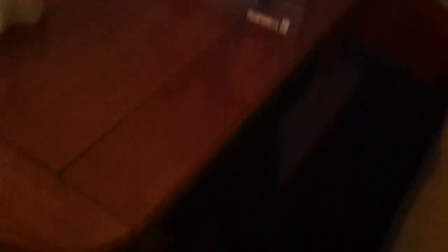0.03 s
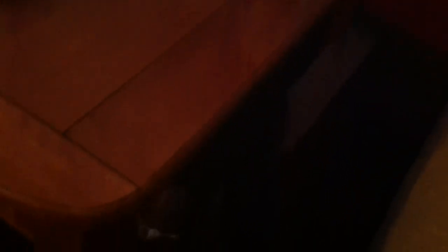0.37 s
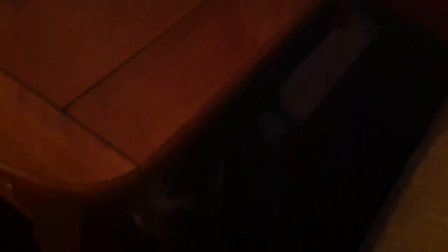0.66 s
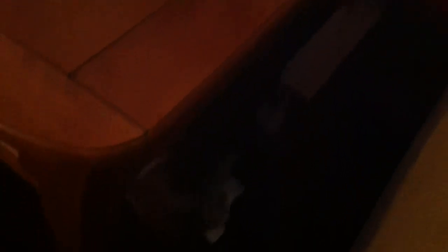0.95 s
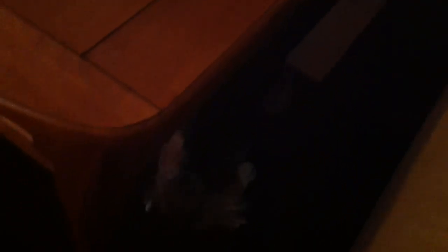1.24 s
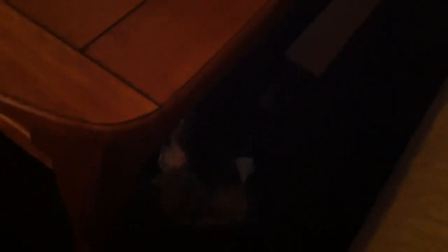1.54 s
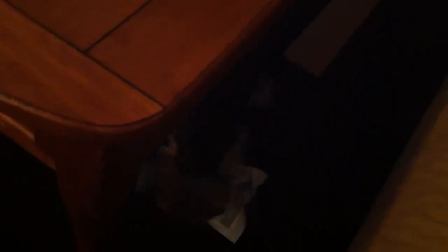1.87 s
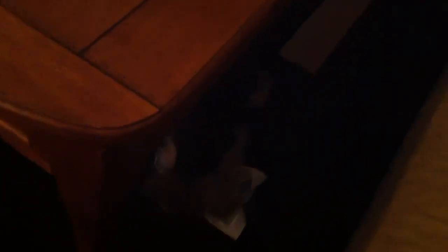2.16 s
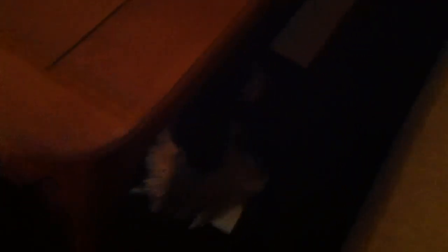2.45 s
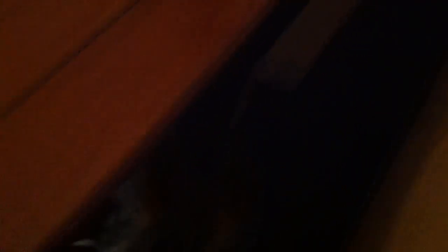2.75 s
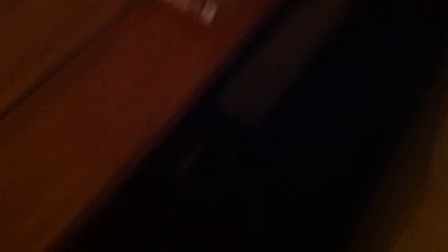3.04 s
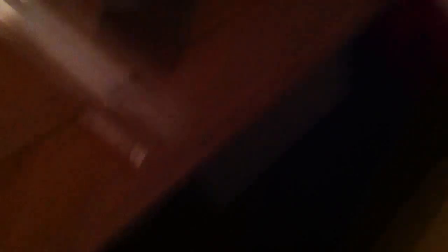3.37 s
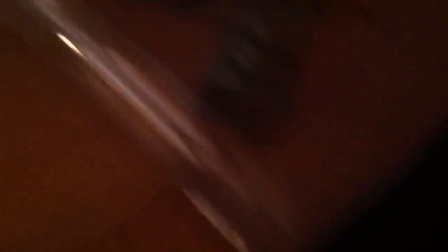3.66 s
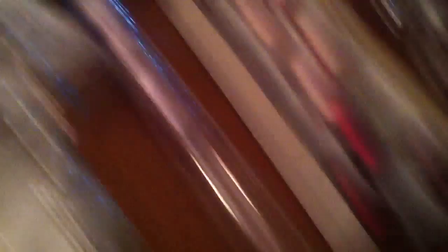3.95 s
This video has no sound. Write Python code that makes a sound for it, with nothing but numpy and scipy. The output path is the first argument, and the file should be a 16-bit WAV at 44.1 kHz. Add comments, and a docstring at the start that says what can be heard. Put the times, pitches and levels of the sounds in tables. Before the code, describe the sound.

Paper rustles softly as a small animal paws it on the floor, with short rubs, crisp crackles and a few light pats in the first 1.5 seconds. The rustles thin out, then grow busier from 2.7 seconds, with more pats around 3. From 3.2 seconds a long, bright swish with sharp crackles swells, loudest near 3.4, fading by 4 into the quiet room's low murmur and faint hiss.

```python
"""A sheet of paper, pawed by a small animal on the floor of a quiet room.
Each push rubs the sheet: tiny friction slips, coloured by its resonances.
Creases buckle and snap, ringing the facets beside them; paws and paper pat the floor.
Near the end one long, bright swish dies away over the low murmur of the room's air."""
import sys
import numpy as np
from scipy import signal
from scipy.fft import rfft, irfft
from scipy.io import wavfile
from scipy.ndimage import uniform_filter1d

SR = 44100
rng = np.random.default_rng(int(sys.argv[2]) if len(sys.argv) > 2 else 0)


def master(y):
    """Save y as 16-bit WAV."""
    cut = np.clip(np.atleast_2d(y).T, -1, 1)
    pcm = np.round(cut * 32767)  # scale
    wavfile.write(sys.argv[1], SR, pcm.astype(np.int16))


N = 176400
TIME_S = np.arange(N) / SR

# pushes on the sheet: start_s, rise_s, fade_s, level_db, tilt_db_per_octave
PUSHES = [(-.03, 0.029, 0.4, -52.5, -3.5), (0.051, 0.021, 0.04, -47, -1.5), (.17, 0.021, 0.04, -48, -4),
          (0.269, 0.0063, 0.16, -48, -0.3), (.38, 0.14, 0.075, -57, 0), (0.628, 0.027, 0.3, -49, -1.4),
          (.81, 0.026, 0.028, -54, 1.5), (.924, 0.0085, 0.1, -52.5, -2.5), (1.09, 0.034, 0.02, -47, -2),
          (1.13, 0.0091, 0.39, -60.5, -1), (1.348, 0.043, 0.02, -43, -0.6),
          (1.56, 0.037, 0.13, -57.5, -1.5), (1.893, 0.019, 0.051, -48.5, -1.2),
          (1.935, 0.034, 0.028, -53, 2), (2.14, 0.026, 0.41, -58.5, -2), (2.29, 0.038, 0.052, -50, -1.2),
          (2.42, 0.032, 0.019, -54, 1.5), (2.52, 0.14, 0.35, -56.5, -4), (2.693, 0.013, 0.078, -42, -2),
          (2.92, 0.032, 0.29, -52.5, -2), (2.995, 0.021, 0.032, -37, -1.4), (3.11, 0.061, 0.024, -50, -3)]
# rub spectrum: freq_hz, gain_db
RUB_SPECTRUM = [(40, -10), (120, -2), (400, 1), (900, 2), (1600, 2.5), (2400, 1.5), (2900, -0.5), (4200, 3),
                (5600, 3.5), (7600, 1.5), (12000, 2), (17000, -1.5)]
# resonances of the sliding sheet: centre_hz, width_hz, lift_db
SHEET_RESONANCES = [(955, 63, 6.5), (1460, 97, 2), (2120, 74, 3)]
# room murmur before its low-pass: freq_hz, gain_db
MURMUR_SPECTRUM = [(30, -40), (60, -47), (85, -15.5), (125, -5), (160, 0), (195, -3.5), (260, 1.5),
                   (330, -3), (460, -4), (560, -12), (650, -7), (760, -15), (1000, -9.5)]
# faint hiss: freq_hz, gain_db
HISS_SPECTRUM = [(200, -5), (900, -4), (1500, -4.5), (3000, -10), (6000, -12), (10000, -16.5), (17000, -18)]
# pats on the floor: start_s, level_db, pitch_hz
FLOOR_PATS = [(0.057, -46, 396), (.146, -43.5, 420), (.279, -37, 750), (0.288, -41, 840),
              (0.312, -39.5, 385), (0.324, -42, 377), (2.707, -40.5, 760), (2.936, -43, 820),
              (2.948, -41.5, 477), (2.965, -41, 760), (2.983, -38.5, 700), (2.999, -38, 520),
              (3.0076, -32.5, 690), (3.018, -36.5, 790), (3.031, -36.5, 524), (3.145, -47, 695),
              (3.174, -44.5, 450), (3.283, -34.5, 880), (3.3657, -28, 1210), (3.405, -33, 684)]
# buckling creases: start_s, level_db, pitch_hz, decay_s
CREASE_SNAPS = [(0.0895, -42, 1580, 0.0008), (0.1935, -30.5, 9900, 0.0016), (0.2726, -40, 5000, 0.0012),
                (0.2815, -35, 3750, 0.0036), (0.288, -44, 4200, 0.0016), (.3128, -38, 10000, 0.0014),
                (0.389, -43.5, 2600, 0.0017), (0.6983, -37.5, 4000, 0.003), (0.7403, -39.5, 6500, .002),
                (0.8129, -33, 1600, 0.0027), (0.928, -42, 2400, 0.002), (0.9396, -34, 2600, 0.0036),
                (0.9454, -35.5, 4500, 0.0026), (0.9772, -34.5, 2420, 0.0011), (.9803, -38, 2700, 0.00063),
                (1.0452, -39.5, 1210, 0.00087), (1.294, -48, 4900, 0.0034), (1.3423, -40.5, 4400, 0.0019),
                (1.3541, -38, 1740, 0.0013), (1.3701, -35, 5840, 0.0016), (1.3924, -41, 5000, 0.0025),
                (1.4065, -38.5, 2500, 0.0027), (1.5725, -45, 7000, 0.0012), (1.8225, -38, 5700, 0.0018),
                (1.883, -40.5, 7140, 0.004), (2.19, -47, 3120, 0.0023), (2.334, -35, 2430, 0.0027),
                (2.384, -45, 2500, .001), (2.515, -32, 10700, 0.0018), (2.707, -35.5, 4500, 0.0017),
                (2.7102, -45, 9000, .001), (2.7237, -35, 5600, 0.00092), (2.7346, -34.5, 8000, .0012),
                (2.7596, -39, 5970, 0.00047), (2.856, -40, 5050, 0.0055), (2.953, -47, 5400, 0.00089),
                (2.965, -37, 1600, 0.0011), (3.0047, -29, 1240, 0.001), (3.008, -31, 5260, .0015),
                (3.0195, -37, 3500, 0.0024), (3.0408, -33.5, 6500, 0.00087), (3.212, -40, 7760, 0.0015),
                (3.2432, -37, 6400, 0.00068), (3.255, -34.5, 3930, 0.0017), (3.2747, -33, 1700, 0.0025),
                (3.308, -43, 8900, 0.0009), (3.3155, -36, 6000, .0006), (3.3446, -30.5, 2540, 0.00053),
                (3.366, -27.5, 1500, 0.0031), (3.402, -31, 5800, 0.0031), (3.4057, -22.5, 3600, 0.004),
                (3.4375, -26, 10000, .004)]
# snap spectrum: freq_hz, gain_db
SNAP_SPECTRUM = [(40, -39), (200, -6), (750, -0.5), (1400, 4.5), (3000, 3.5), (5500, 4.5), (8000, -1),
                 (12000, -3), (17000, -13)]
# course of the long slide: time_s, level_db, tilt_db_per_octave
SWISH_CONTOUR = [(3.204, -54, 0.5), (3.225, -44.5, -1), (3.255, -44, -1), (3.30, -46.5, -0.8),
                 (3.355, -42.5, 0), (3.389, -37.5, 0), (3.408, -31.5, 1.5), (3.425, -35.5, 1),
                 (3.455, -30, 3.5), (3.477, -33, 0.5), (3.493, -38.5, -0.2), (3.55, -39.5, 0.2),
                 (3.59, -46.5, 0.3), (3.67, -46, -1.3), (3.83, -51, 0.2), (3.92, -56, -0.5),
                 (4.0, -63.5, 0)]
# swish spectrum: freq_hz, gain_db
SWISH_SPECTRUM = [(40, -37), (130, 6), (400, 6.5), (900, 4.5), (1500, 4.5), (2800, 1.5), (4000, 3),
                  (6000, 2), (8000, 0.5), (11500, -0.5), (14000, -0.5), (17000, -6)]
# room decay: freq_hz, t60_s
ROOM_DECAY = [(150, 0.89), (1000, 0.48), (5000, 0.3), (16000, 0.58)]

LEAD_SAMPLES = 96  # ahead of a burst's onset


def amp(db):
    """Decibels to gain."""
    return 10 ** (np.asarray(db) / 20)


def unit(x):
    """Scale to rms 1."""
    return x / np.sqrt(np.mean(x ** 2) + 1e-20)


def lookup(points, hz):
    """Interpolate a table over log frequency."""
    freq_hz, value = np.transpose(points)
    return np.interp(np.log(hz + 1), np.log(freq_hz + 1), value)


def octaves(hz):
    """Octaves above the middle of the paper's range."""
    return np.log2(np.maximum(hz, 300) / 4000)


def coloured(x, spectrum, tilt_db_per_octave=0):
    """Apply a tilted spectrum; rms 1."""
    hz = np.fft.rfftfreq(len(x), 1 / SR)
    gain = amp(lookup(spectrum, hz) + tilt_db_per_octave * octaves(hz))
    return unit(irfft(rfft(x) * gain, len(x)))


def friction(slip_share, flutter_db, bands=8, band_slips_per_s=600, spread_db=3):
    """Tiny uneven slips in each band over smooth hiss, fluttering as the grip changes."""
    hz = np.fft.rfftfreq(N, 1 / SR)
    band = np.interp(np.sqrt(hz), np.sqrt([500, 16000]), [0, bands - 1])
    slips = np.zeros(N)
    for k in range(bands):
        impulses = (rng.random(N) < band_slips_per_s / SR) * rng.choice([-1, 1], N)
        sizes = amp(spread_db * np.minimum(rng.exponential(1, N), 3.5))
        passband = np.cos(np.pi / 2 * np.clip(band - k, -1, 1))
        slips += irfft(rfft(unit(impulses * sizes)) * passband, N)
    flutter = unit(uniform_filter1d(uniform_filter1d(rng.standard_normal(N), size=300), size=200))
    hiss = np.sqrt(1 - slip_share) * rng.standard_normal(N)
    return (np.sqrt(slip_share) * unit(slips) + hiss) * amp(flutter_db * flutter)


def sheet(x, bend_octaves=0):
    """The sheet's resonances, shifted by bending, colour the friction."""
    hz = np.fft.rfftfreq(N, 1 / SR) / 2 ** bend_octaves
    gain_db = sum(lift_db / (1 + (2 * (hz - centre_hz) / width_hz) ** 2)
                  for centre_hz, width_hz, lift_db in SHEET_RESONANCES)
    return irfft(rfft(x) * amp(gain_db), N)


def flexing(x, depth_db):
    """Flexing makes small resonances come and go: a few hundred Hz wide, tens of ms long."""
    frames = signal.stft(x, SR, nperseg=512)[2]
    patches = uniform_filter1d(rng.standard_normal(frames.shape), size=4, axis=0)
    patches = unit(uniform_filter1d(patches, size=7, axis=1))
    return signal.istft(frames * unit(amp(depth_db * patches)), SR, nperseg=512)[1][:N]


def rubs(max_bend_octaves=0.28):
    """Each push bends the sheet anew; its rub swells, then fades as the sheet settles."""
    out = np.zeros(N)
    slips = friction(slip_share=0.6, flutter_db=1.86)
    for start_s, rise_s, fade_s, level_db, tilt_db_per_octave in PUSHES:
        age_s = TIME_S - start_s
        envelope = np.clip(age_s / rise_s, 0, 1) * np.exp(-np.maximum(age_s - rise_s, 0) / fade_s)
        rub = coloured(np.roll(slips, rng.integers(N)), RUB_SPECTRUM, tilt_db_per_octave)
        out += amp(level_db) * envelope * sheet(rub, max_bend_octaves * rng.uniform(-1, 1))
    return out


def air(murmur_db=-55.5, hiss_db=-62):
    """Steady low room murmur and faint hiss."""
    lowpass = signal.butter(4, 900, fs=SR, output="sos")
    murmur = signal.sosfilt(lowpass, coloured(rng.standard_normal(N), MURMUR_SPECTRUM))
    hiss = coloured(rng.standard_normal(N), HISS_SPECTRUM)
    return amp(murmur_db) * unit(murmur) + amp(hiss_db) * hiss


def add(mix, start_s, sound):
    """Mix a sound in at start_s."""
    part = mix[max(round(start_s * SR), 0):][:len(sound)]
    part += sound[:len(part)]


def burst(decay_s, colour_db, size=4096):
    """Decaying noise puff, flattened, then filtered by colour_db(hz); energy 1."""
    hz = abs(np.fft.fftfreq(size, 1 / SR))
    log_gain = np.log(amp(colour_db(hz)) + 1e-6)
    causal_filter = np.exp(np.conj(signal.hilbert(log_gain)))
    puff = np.fft.fft(rng.standard_normal(size) * np.exp(-np.arange(size) / SR / decay_s))
    puff /= np.sqrt(abs(puff) ** 2 + 0.015 * np.mean(abs(puff) ** 2))
    sound = np.roll(np.fft.ifft(puff * causal_filter).real, LEAD_SAMPLES)[:size // 2]
    return sound / np.linalg.norm(sound)


def pats(decay_s=0.0011, half_width_octaves=0.61, bass_share=0.0097, level_window_s=0.0018):
    """Paws and paper hit the floor: heavily damped knocks, broad around one pitch."""
    out = np.zeros(N)
    for start_s, level_db, pitch_hz in FLOOR_PATS:
        def colour_db(hz):
            hump = 1 / (1 + abs(np.log2((hz + 1) / pitch_hz) / half_width_octaves) ** 3)
            bass = bass_share * pitch_hz / (pitch_hz + hz)
            return 20 * np.log10(hump + bass)
        gain = amp(level_db) * np.sqrt(level_window_s * SR)
        add(out, start_s - LEAD_SAMPLES / SR, gain * burst(decay_s, colour_db))
    return out


def snaps(lift_db=8, half_width_octaves=0.25, level_window_s=0.00065):
    """A crease buckles and the facet beside it rings; small facets ring higher and crack brighter."""
    out = np.zeros(N)
    for start_s, level_db, pitch_hz, decay_s in CREASE_SNAPS:
        def colour_db(hz):
            ring_db = lift_db / (1 + (np.log2((hz + 1) / pitch_hz) / half_width_octaves) ** 2)
            tilt_db_per_octave = 3.2 * octaves(pitch_hz)
            return lookup(SNAP_SPECTRUM, hz) + ring_db + tilt_db_per_octave * octaves(hz)
        gain = amp(level_db) * np.sqrt(level_window_s * SR)
        add(out, start_s - LEAD_SAMPLES / SR, gain * burst(decay_s, colour_db))
    return out


def swish():
    """One long slide of the sheet, brightest where loudest."""
    time_s, level_db, tilt_db_per_octave = np.transpose(SWISH_CONTOUR)
    slide = coloured(friction(slip_share=0.45, flutter_db=0.44), SWISH_SPECTRUM)
    hz, frame_s, frames = signal.stft(slide, SR, nperseg=256)
    tilt = amp(octaves(hz)[:, None] * np.interp(frame_s, time_s, tilt_db_per_octave))
    power = amp(lookup(SWISH_SPECTRUM, hz)) ** 2
    tilt /= np.sqrt(power @ tilt ** 2 / power.sum())  # constant total power
    envelope = amp(np.interp(TIME_S, time_s, level_db)) * (TIME_S > time_s[0])
    return sheet(signal.istft(frames * tilt, SR, nperseg=256)[1][:N] * envelope)


def room(x, early_s=0.014, early_width_s=0.004, early_lift=1.3, blur_octaves=0.4):
    """Early reflections off furniture and a diffuse tail: power, blurred in pitch, decays per band."""
    hz, frame_s, frames = signal.stft(x, SR, nperseg=256)
    pitch_octaves = np.log2(hz + hz[1])
    blur = np.exp(-((pitch_octaves[:, None] - pitch_octaves) / blur_octaves) ** 2)
    power = blur @ abs(frames) ** 2 / blur.sum(1)[:, None]
    age_s = frame_s[frame_s < 0.5]
    tail = amp(-60 * age_s / lookup(ROOM_DECAY, hz)[:, None]) ** 2 * (age_s > age_s[1])
    tail *= 1 + early_lift * np.exp(-((age_s - early_s) / early_width_s) ** 2)
    tail /= tail.sum(1)[:, None]
    reflected = signal.fftconvolve(power, tail, axes=1)[:, :len(frame_s)]
    noise = signal.stft(rng.standard_normal(N), SR, nperseg=256)[2]
    return signal.istft(noise / noise.std() * np.sqrt(abs(reflected)), SR, nperseg=256)[1][:N]


def scene():
    """Paper and paws, their reflections, room air; mono."""
    hits = snaps() + pats()
    sliding = amp(-1) * flexing(rubs() + swish(), depth_db=2.5)
    reflections = room(amp(-5.5) * hits + amp(-9) * sliding)
    return (hits + sliding + reflections + air())[None]


def record(dry):
    """Microphone bass roll-off, then band limit."""
    low_hz, high_hz = 110, 17450
    highpass = signal.butter(1, low_hz, "highpass", fs=SR, output="sos")
    lowpass = signal.firwin(511, high_hz, window=("kaiser", 9), fs=SR)
    return signal.oaconvolve(signal.sosfilt(highpass, dry), lowpass[None], "same")


dry = scene()
out = record(dry)
master(out)
```